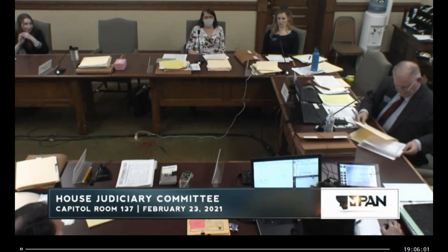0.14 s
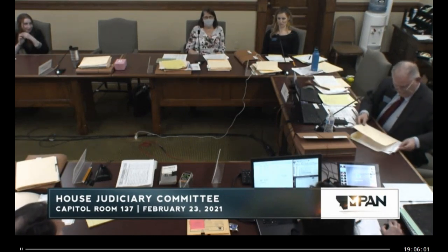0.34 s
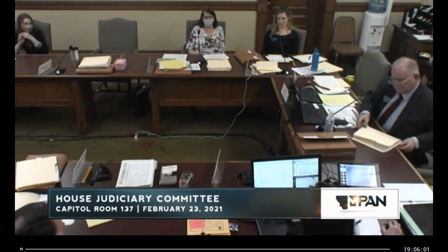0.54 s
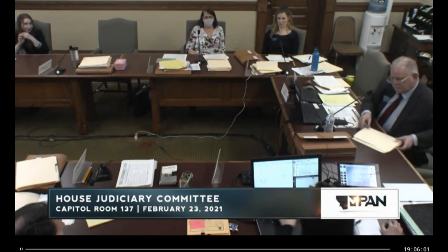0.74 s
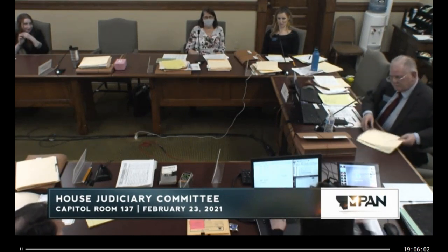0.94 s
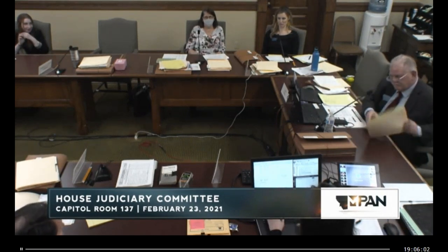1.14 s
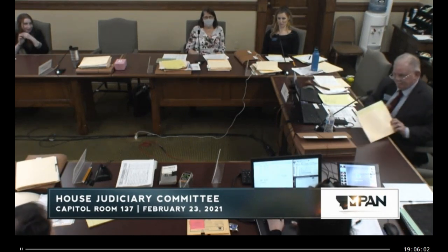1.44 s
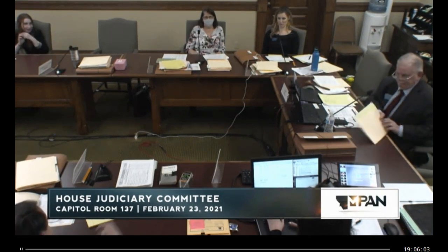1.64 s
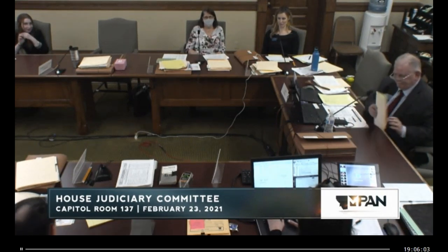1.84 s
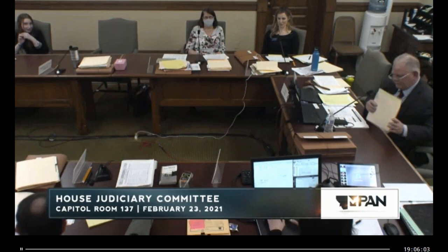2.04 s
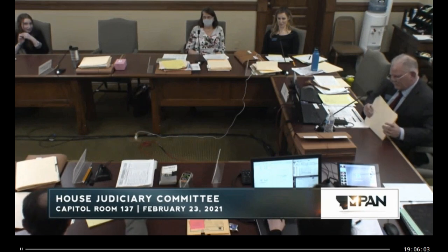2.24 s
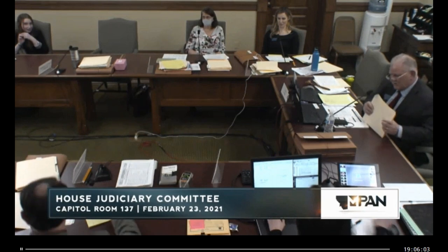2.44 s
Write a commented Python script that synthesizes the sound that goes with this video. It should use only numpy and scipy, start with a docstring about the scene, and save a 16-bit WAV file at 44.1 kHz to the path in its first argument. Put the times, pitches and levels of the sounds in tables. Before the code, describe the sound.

A card folder and papers rustle faintly, then slide and scrape, followed by dull thumps and crisp snaps, loudest near the end; close microphone in a quiet room with a low wavering electrical hum.

```python
"""Papers and a card folder at a desk

A person in a quiet room shuffles papers, slides a card folder, lifts it and taps it on the desk.
Rustle is noise plus many tiny slips; the slide is rubbing noise at steady and gliding pitches.
Snaps are clicks and crackles that ring briefly; thumps are short low pushes with a noisy body.
Underneath lie a low wavering hum, soft room noise and stirred air."""
import sys
import numpy as np
from scipy import signal
from scipy.fft import rfft, irfft
from scipy.io import wavfile

SR = 44100
rng = np.random.default_rng(int(sys.argv[2]) if len(sys.argv) > 2 else 0)


def store_wav(level_fs):
    """Save 16-bit WAV to argv[1]."""
    pcm = np.round(np.clip(np.atleast_2d(level_fs), -1, 1) * 32767)
    wavfile.write(sys.argv[1], SR, pcm.T.astype(np.int16))


N = 114660   # length in samples, 2.6 s

# level of the hum over time: start_s, level_db
HUM_LEVEL = [(0, -50.5), (1.0, -51), (1.8, -44.5), (2.6, -46.5)]
# narrow noisy tones in the hum, levels relative to each other: pitch_hz, width_hz, level_db
HUM_TONES = [(131.1, 22.4, -5.5), (92.2, 22.7, -6), (326.2, 9.8, -11)]
# shape of the room noise, relative levels: frequency_hz, level_db (per Hz)
ROOM_COLOUR = [(94, -57), (160, 2.5), (200, -6), (243, -4), (416, -13.5), (995, -30), (1170, -20.5),
               (2590, -26.5), (3000, -25.5), (3900, -41), (6600, -120)]
# air stirred at the microphone: start_s, level_db
AIR_LEVEL = [(0, -83), (1.17, -65), (1.23, -51), (1.32, -42.5), (1.45, -50.5), (1.66, -64.5), (1.9, -43),
             (2.1, -67), (2.6, -59)]
# the folder edge thumps the desk: start_s, peak_db, pitch_hz, swell_s
THUMP_EVENTS = [(0.866, -48, 334, 0.0028), (0.894, -50, 298, 0.0064), (1.038, -41, 316, 0.0046),
                (1.058, -37, 203, 0.0069), (1.211, -35.5, 200, 0.0041), (1.312, -33.5, 152, 0.012),
                (1.519, -45, 384, .004), (1.567, -40, 290, 0.0029), (1.7124, -18, 200, 0.0045),
                (1.823, -18.5, 180, 0.006), (1.8313, -20, 190, 0.0048), (1.933, -33.5, 175, 0.0034),
                (2.054, -21.5, 140, 0.003), (2.056, -30, 318, 0.0089), (2.105, -34.5, 102, 0.027),
                (2.283, -36.5, 280, 0.0011)]
# the folder slides: start_s, level_db, low_resonance_share_db
SLIDE_LEVEL = [(1.038, -46, -1), (1.06, -40, 4), (1.13, -33.5, -13), (1.18, -46.5, 2.5), (1.3, -46, 0),
               (1.385, -40, -8.5), (1.5, -43, -5.5), (1.8, -56, -2), (2.02, -69.5, -3)]
# low, middle and top resonance heard in the slide: width_hz, level_db
SLIDE_RESONANCES = [(136, -2), (75.6, 0.5), (197, -7)]
# resonances glide as the contact moves: start_s, low_hz, middle_hz, top_resonance_share_db
SLIDE_GLIDE = [(1.049, 1528, 1880, -12), (1.12, 1341, 1975, -24), (1.301, 1303, 1900, -5),
               (1.4, 1200, 1880, -1.5), (1.6, 1202, 1948, -2.5)]
# paper and card snap: start_s, peak_db, pitch_hz, crackle_length_s, broad_colour_db
SNAP_EVENTS = [(0.0157, -32.5, 2100, 0.0075, -1), (0.396, -37, 2530, 0.00099, -12),
               (0.889, -42.5, 1950, 0.0086, -15), (1.048, -22.5, 1635, 0.0015, -40),
               (1.214, -25.5, 2550, 0.0019, 18), (1.226, -26, 4350, 0.007, -2),
               (1.5218, -16, 1830, 0.00099, -29), (1.713, -31.5, 2160, 0.011, -3.5),
               (1.8233, -25, 3600, 0.0018, 3), (1.832, -24.5, 4200, 0.0031, -2.5),
               (2.049, -18, 2600, 0.00096, 2), (2.054, -15, 2040, 0.0013, -14),
               (2.059, -18.5, 1830, 0.0064, -11), (2.062, -7.5, 2410, 0.00082, 16),
               (2.338, -40.5, 7140, 0.0074, -4.5), (2.4006, -10.5, 5040, 0.002, 0.5),
               (2.4051, -8.5, 4470, 0.00085, -8.5), (2.408, -5, 4390, 0.00026, -10.5),
               (2.4094, -11.5, 5100, 0.0019, 3.5), (2.476, -38.5, 1690, 0.0054, -7),
               (2.515, -31, 1950, 0.0035, -7)]
# paper rustle over time: start_s, level_db, treble_level_db
RUSTLE_LEVEL = [(0, -64, -73.5), (.05, -64.5, -85), (.15, -71, -85), (.18, -62, -68), (.3, -63.5, -76.5),
                (.315, -56, -64.5), (.39, -53, -63.5), (.45, -65.5, -80), (.615, -75.5, -93),
                (.63, -72.5, -75.5), (.76, -67.5, -79), (.884, -63, -82), (.893, -52, -76), (.97, -67, -81),
                (1.035, -63.5, -86), (1.06, -54, -72), (1.105, -42, -57), (1.15, -48, -61),
                (1.25, -45, -57.5), (1.55, -52, -63), (1.81, -53, -65), (1.826, -48, -51.5),
                (1.85, -58.5, -70.5), (1.93, -54, -63), (2.0, -65.5, -77.5), (2.03, -54.5, -63),
                (2.065, -45, -39), (2.13, -62.5, -70.5), (2.28, -51.5, -58), (2.315, -57.5, -69),
                (2.385, -99, -79), (2.398, -43.5, -102), (2.425, -62.5, -67.5), (2.6, -64.5, -79)]
# shape of the rustle noise, relative levels: frequency_hz, level_db (per Hz)
RUSTLE_COLOUR = [(900, -32), (1150, -34), (1900, -0.5), (2740, -2.5), (3610, -9), (4490, -3.5),
                 (5460, -11.5), (6200, -12.5), (14000, -39)]

ROOM_DB, ROOM_WAVER_DB = -62.5, 2.0   # room noise level at the start, before its waver
AIR_LOW_HZ, AIR_TOP_HZ = 39, 77.5
# the noisy body of a thump: level at 200 Hz, its rise with pitch, top edge as a multiple of the pitch
BODY_DB, BODY_DB_PER_OCTAVE, BODY_REACH = -15, 9.5, 1.76
SLIDE_TOP_HZ = 2470
GRAINS_PER_S, GRAIN_SPREAD_DB = 1500, 4.0
SNAP_Q, SNAP_RISE_S = 4.03, 0.00043   # Q: sharpness of the ring
TAIL_DB, TAIL_T60_S = -14, 0.021   # T60: time to fall by 60 dB
HANDLING_DB, HANDLING_HZ = -16, 390   # dull rubbing, relative to the rustle level
WIDE_FROM_HZ, WIDE_DB = 5130, -5
ROOM_WIDE_HZ, ROOM_WIDE_DB = 577, -15
CUTOFF_HZ = 14100


def amp(db):
    """Turn decibels into a multiplier."""
    return 10 ** (np.asarray(db) / 20)


def rms_one(x):
    """Scale a sound to an average strength (rms) of 1."""
    return x / np.sqrt(np.mean(x ** 2) + 1e-20)


def in_time(rows, outside=None):
    """Draw straight lines between table rows, giving each column a value at every sample."""
    start_s, *columns = np.transpose(rows)
    now_s = np.arange(N) / SR
    return [np.interp(now_s, start_s, column, outside, outside) for column in columns]


def butter(x, hz, kind, order=2):
    """Keep the lows, the highs or a band with a smooth Butterworth filter."""
    return signal.sosfilt(signal.butter(order, hz, kind, fs=SR, output="sos"), x)


def drift(rate_hz):
    """Wander randomly around zero with spread 1: smoothed noise, one point per 40 samples."""
    r = np.exp(-80 * np.pi * rate_hz / SR)
    noise = rng.standard_normal(N // 40 + 2002)
    slow = signal.lfilter([1], [1, -2 * r, r * r], noise)[2000:]   # drop the filter's start-up
    return np.interp(np.arange(N) / 40, np.arange(len(slow)), rms_one(slow))


def coloured(x, spectrum):
    """Shape noise by frequency, joining the table's points on a logarithmic pitch scale."""
    hz, db = np.transpose(spectrum)
    grid_hz = np.maximum(np.fft.rfftfreq(N, 1 / SR), 1)
    curve_db = np.interp(np.log(grid_hz), np.log(hz), db, -60, -60)
    return irfft(rfft(x) * amp(curve_db), N)


def resonances(x, table):
    """Ring several resonances side by side; every second one is flipped in sign."""
    out = 0
    for k, (hz, width_hz, db) in enumerate(table):
        r = np.exp(-np.pi * width_hz / SR)
        feed = [(1 - r * r) / 2, 0, (r * r - 1) / 2]
        ring = [1, -2 * r * np.cos(2 * np.pi * hz / SR), r * r]
        out = out + (-1) ** k * amp(db) * signal.lfilter(feed, ring, x)
    return out


def grains():
    """Friction as dense tiny slips of uneven size on a bed of noise."""
    sizes = amp(GRAIN_SPREAD_DB * np.minimum(rng.exponential(1, N), 5))
    sizes = sizes * rng.choice([-1, 1], N)
    slips = sizes * (rng.random(N) < GRAINS_PER_S / SR)
    return rms_one(slips) + 1.14 * rng.standard_normal(N)


def add(out, start_s, burst):
    """Mix a burst in at its start time, cutting it at the end of the sound."""
    i = int(start_s * SR)
    out[..., i:i + burst.shape[-1]] += burst[..., :N - i]


def room_noise(level_db):
    """Shaped noise that follows the hum level and wavers on its own."""
    gain = amp(ROOM_DB + level_db - level_db[0] + ROOM_WAVER_DB * drift(5))
    return gain * rms_one(coloured(rng.standard_normal(N), ROOM_COLOUR))


def hum():
    """A tone of wavering phase with narrow noisy tones, over room noise; also a second, unrelated room noise."""
    level_db, = in_time(HUM_LEVEL)
    noisy = rms_one(resonances(rng.standard_normal(N + SR), HUM_TONES)[SR:])
    steady = np.sin(2 * np.pi * HUM_TONES[0][0] * np.arange(N) / SR + 1.0 * drift(1.08))
    tone = rms_one(noisy + 2.92 * steady)
    return amp(level_db) * tone + room_noise(level_db), room_noise(level_db)


def air():
    """Stirred air at the microphone, as lumpy very low noise."""
    x = butter(rng.standard_normal(N + SR), AIR_TOP_HZ, "low", order=3)
    x = butter(x, AIR_LOW_HZ, "high")[SR:]
    return amp(in_time(AIR_LEVEL)[0]) * rms_one(x)


def thumps():
    """A soft low push on the desk that swells and dies, with a dull noisy body that lingers."""
    out, t = np.zeros(N), np.arange(int(.2 * SR)) / SR
    for start_s, peak_db, hz, swell_s in THUMP_EVENTS:
        u = t / swell_s
        push = u ** 2 * np.exp(1 - u ** 2) * np.sin(2 * np.pi * hz * t)
        noise = butter(rng.standard_normal(len(t)), hz * BODY_REACH, "low", order=3)
        body = u * np.exp(1 - u) * rms_one(butter(noise, hz / 2, "high"))
        body_db = BODY_DB + BODY_DB_PER_OCTAVE * np.log2(hz / 200)
        add(out, start_s, amp(peak_db) * (amp(body_db) * body - push))
    return out


def slide():
    """Friction heard through three resonances, two gliding, each coming and going on its own."""
    level_db, low_db = in_time(SLIDE_LEVEL, -120)
    low_hz, middle_hz, top_db = in_time(SLIDE_GLIDE)
    pitches = [low_hz, middle_hz, np.full(N, SLIDE_TOP_HZ)]
    shares = [np.maximum(low_db, -20), 0, top_db]
    out = 0
    for (width_hz, own_db), hz, share_db in zip(SLIDE_RESONANCES, pitches, shares):
        rub = butter(grains() + 1j * grains(), width_hz / 2, "low", order=1)
        # spinning the slow complex noise moves it up to the wanted pitch
        ringing = (rub * np.exp(2j * np.pi * np.cumsum(hz) / SR)).real
        out = out + amp(own_db + share_db + 2.36 * drift(34)) * ringing
    out = butter(out, [1080, 4500], "band", order=4)
    return amp(level_db) * rms_one(out)


def snaps():
    """A click and a dying crackle pass through a ring and a broad paper colour, with a faint tail.

    The second row has its own crackle and no click."""
    out, t = np.zeros((2, N)), np.arange(int(.12 * SR)) / SR
    broad_colour = [(2330, 930, 4.0), (4880, 4500, -1), (6400, 3000, -1)]   # pitch_hz, width_hz, level_db
    for start_s, peak_db, hz, length_s, broad_db in SNAP_EVENTS:
        fade = np.exp(-t / length_s) + amp(TAIL_DB - 60 * t / TAIL_T60_S)
        push = rng.standard_normal((2, len(t))) * (1 - np.exp(-t / SNAP_RISE_S)) * fade
        push[0, 4] += 5.0   # the click
        ring = resonances(push, [(hz, 2 * hz / SNAP_Q, 0)])
        ring = resonances(ring, [(hz, hz / SNAP_Q, 6)])
        broad = butter(resonances(push, broad_colour), 530, "high")
        broad = butter(broad, 6400, "low", order=3)
        x = ring + amp(broad_db) * broad
        add(out, start_s, amp(peak_db) * x / np.abs(x[0]).max())
    return out


def rustle():
    """Paper friction with separate middle and treble levels, plus dull rubbing; and an unrelated twin."""
    mid_db, top_db = in_time(RUSTLE_LEVEL)
    out = []
    for _ in range(2):
        x = coloured(grains(), RUSTLE_COLOUR)
        body = butter(x, 5530, "low", order=4)
        top = butter(x, 6550, "high", order=4)
        body = body / np.std(butter(body, 2010, "high", order=4))   # level set by its part above 2010 Hz
        body = amp(mid_db + 1.81 * drift(26)) * body
        out.append(body + amp(top_db + 1.7 * drift(19.0)) * rms_one(top))
    dull = butter(rng.standard_normal(N), [HANDLING_HZ / 2, HANDLING_HZ * 2], "band")
    return out[0] + amp(mid_db + HANDLING_DB) * rms_one(dull), out[1]


def scene():
    """Put every source in the centre; spread the treble and a little room noise wide."""
    paper, paper_twin = rustle()
    snap, snap_twin = snaps()
    floor, floor_twin = hum()
    mid = paper + snap + slide() + thumps() + air() + floor
    treble = butter(paper_twin + 0.23 * snap_twin, WIDE_FROM_HZ, "high", order=8)
    room_band_hz = [ROOM_WIDE_HZ / 1.21, ROOM_WIDE_HZ * 1.4]
    room = butter(floor_twin, room_band_hz, "band", order=3)
    side = amp(WIDE_DB) * treble + amp(ROOM_WIDE_DB) * room
    return np.array([mid + side, mid - side])   # left, right


def record(dry):
    """Cut off the highest treble with a steep filter."""
    return signal.sosfilt(signal.cheby2(12, 70, CUTOFF_HZ, fs=SR, output="sos"), dry)


dry = scene()
out = record(dry)
store_wav(out)
```